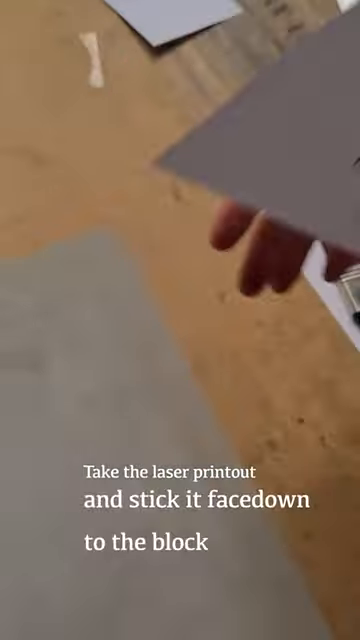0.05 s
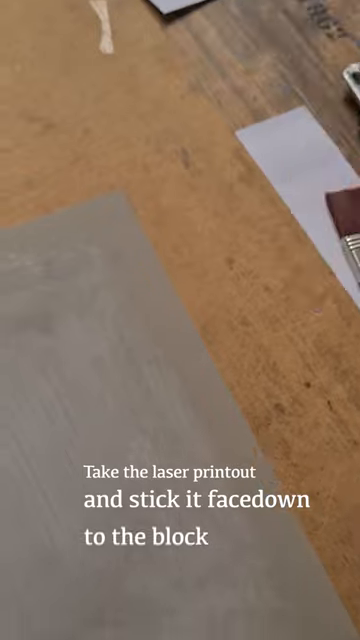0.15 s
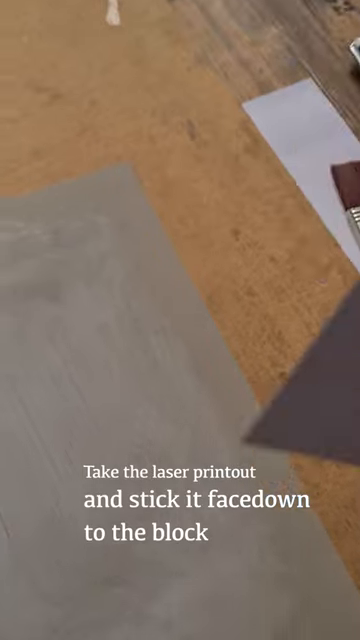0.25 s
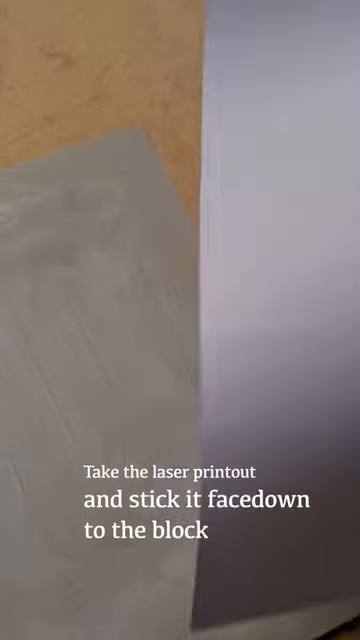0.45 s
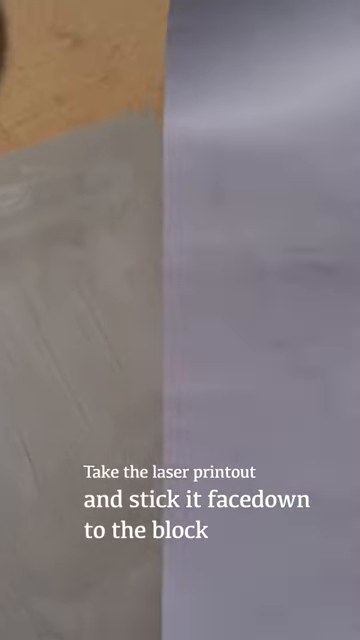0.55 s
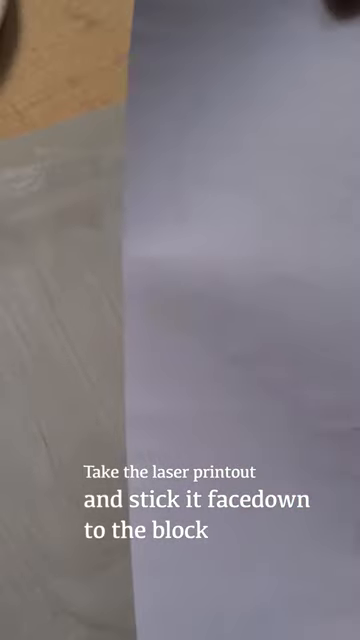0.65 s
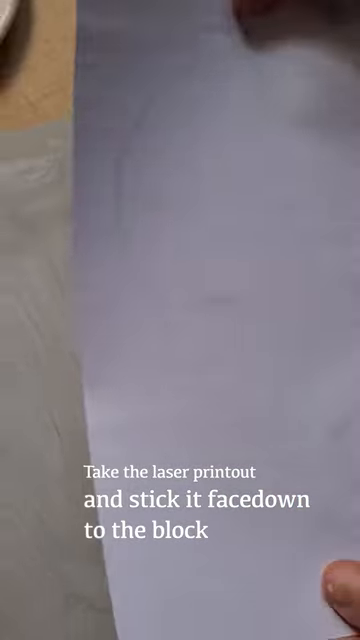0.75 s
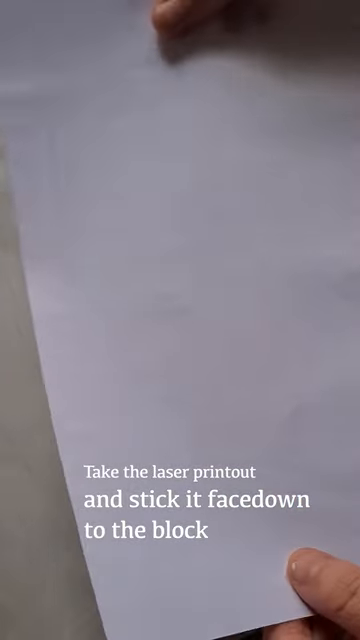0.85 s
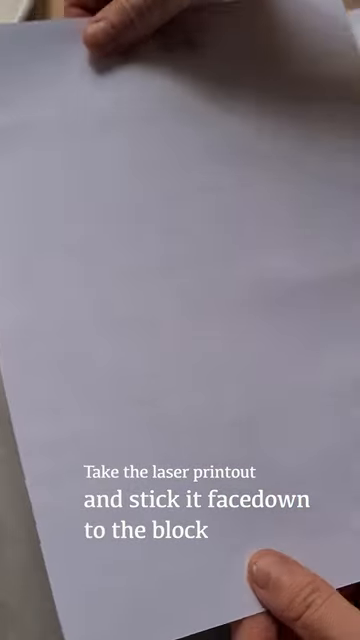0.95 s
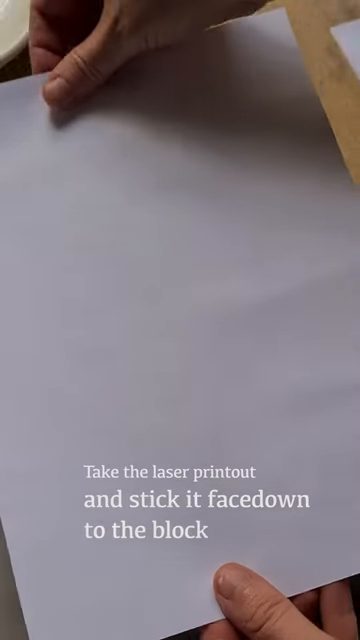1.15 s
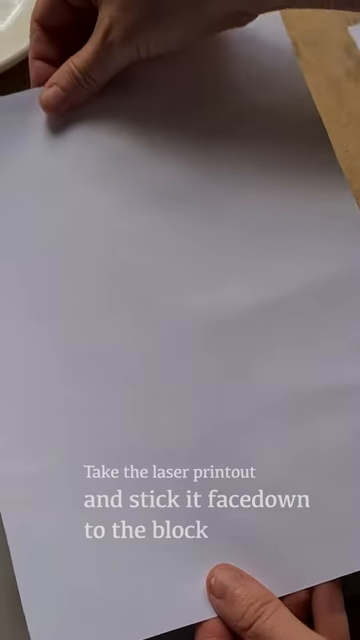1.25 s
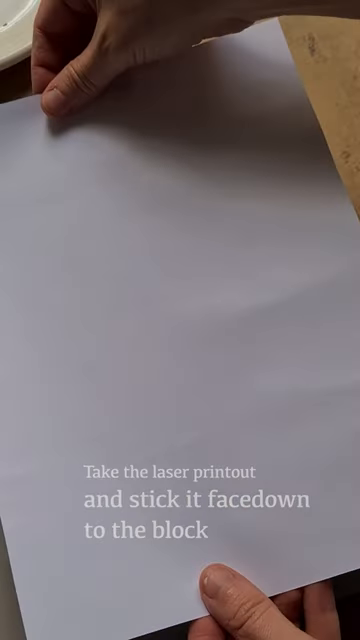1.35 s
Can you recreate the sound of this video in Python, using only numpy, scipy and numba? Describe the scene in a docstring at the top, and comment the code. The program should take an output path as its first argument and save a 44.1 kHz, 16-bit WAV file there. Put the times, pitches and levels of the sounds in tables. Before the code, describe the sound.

Paper handling up close: crisp crinkles, small pops and a soft sliding hiss in a quiet room

```python
"""Indoors, stereo: a large sheet of paper is turned over, brought near a phone and laid on a block on a table.
A quiet room of filtered noise is there from the start, with fingers and paper sliding as a fine noise hiss.
Then damped low sines puff air at the microphones, and sinking noise bands bend the sheet in short crumples.
Creases snap as clicks inside crackle; pops, knocks, pings and a faint squeak are damped sines. The sheet's
resonances colour these and the bends. All the paper has short echoes."""
import sys
import numpy as np
from scipy import signal
from scipy.fft import rfft, irfft
from scipy.io import wavfile
from scipy.ndimage import uniform_filter1d, map_coordinates
from numba import njit

SR = 44100
rng = np.random.default_rng(int(sys.argv[2]) if len(sys.argv) > 2 else 0)


def wav_record(signal):
    """Record a signal, one row per channel, as 16-bit PCM in the file named by sys.argv[1]."""
    frames = np.transpose(np.atleast_2d(signal))
    bounded = np.clip(frames, -1, 1)
    # unit amplitude maps onto the largest positive 16-bit level
    quanta = np.round(bounded * 32767).astype(np.int16)
    wavfile.write(sys.argv[1], SR, quanta)


def invert_db(x):
    """Field ratio 10**(x/20) for x, a level in decibels (scalar or array-like)."""
    u = np.asarray(x, float) / 20
    return 10 ** u


N = 61739  # samples, 1.4 s


def unit(x):
    """Scale to rms 1."""
    return x / np.sqrt(np.mean(x ** 2))


def curve(rows, column=1):
    """A table column joined by straight lines over time."""
    return np.interp(np.arange(N) / SR, [r[0] for r in rows], [r[column] for r in rows])


def decay(t, t60_s):
    """Exponential fade that falls by 60 dB in t60_s."""
    return np.exp(-np.log(1000) * t / t60_s)


def highpass(x, hz, order):
    """Butterworth filter that removes what lies below hz."""
    return signal.sosfilt(signal.butter(order, hz, "high", fs=SR, output="sos"), x)


def colour(x, rows):
    """Causal minimum-phase filter with the given (f/Hz, level/dB) shape, from the folded cepstrum."""
    hz, db = np.array(rows, float).T
    grid_hz = np.arange(4097) * SR / 8192 + 1
    log_gain = np.interp(np.log(grid_hz), np.log(hz), db) * np.log(10) / 20
    cepstrum = irfft(log_gain)
    cepstrum[1:4096] *= 2
    cepstrum[4097:] = 0
    h = irfft(np.exp(rfft(cepstrum)))
    return signal.fftconvolve(x, h / np.sqrt(np.sum(h ** 2)))[:len(x)]


@njit
def svf(x, hz, width):
    """State-variable band-pass whose centre moves; width is a share of the centre."""
    y, band, low = np.empty(len(x)), 0., 0.
    for i in range(len(x)):
        g = np.tan(np.pi * hz[i] / SR)
        v = (band + g * (x[i] - low)) / (1 + g * (g + width))
        band, low, y[i] = 2 * v - band, low + 2 * g * v, width * v
    return y


def grit(size, db):
    """Noise whose samples scatter in size, like many tiny slips."""
    scatter = np.minimum(rng.exponential(size=size), 4)
    return unit(rng.standard_normal(size) * invert_db(db * scatter))


def add(out, x, s):
    """Mix x into out from time s."""
    i = int(s * SR)
    out[..., i:i + x.shape[-1]] += x[..., :N - i]


def ring(rows):
    """Damped sines with a soft start, one a row."""
    out, t = np.zeros(N), np.arange(8000) / SR
    for s, db, hz, t60_ms in rows:
        soft_start = 1 - np.exp(-3 * min(hz, 500) * t)
        add(out, invert_db(db) * np.sin(2 * np.pi * hz * t) * soft_start * decay(t, t60_ms / 1000), s)
    return out


# tone of the quiet room at the microphones: f/Hz, level/dB per Hz (relative)
ROOM_COLOUR = [(25, -1.5), (60, -4), (110, -3), (170, -14), (250, -5.5), (330, -18), (900, -22.5),
               (2000, -20.5), (3800, -30), (8000, -42), (12500, -50), (13500, -59)]


def room():
    """Coloured noise, nearly alike left and right in the bass and less related above."""
    mid, side = (colour(rng.standard_normal(N), ROOM_COLOUR) for _ in range(2))
    side = highpass(side, 430, 1)
    return invert_db(-58.5) * unit(np.array([mid + side, mid - side]))


# loudness of the sliding paper, before left and right are mixed: t/s, level/dB
SLIDE_LEVEL = [(0, -65), (.05, -66.5), (.1, -80), (.2, -77), (.26, -63), (.31, -53), (.34, -59), (.4, -55),
               (.45, -46), (.485, -42.5), (.5, -35.5), (.53, -61), (.6, -47), (.78, -50.5), (.91, -50),
               (.95, -57), (1.04, -64.5), (1.08, -57.5), (1.112, -50), (1.118, -63.5), (1.18, -58),
               (1.22, -65.5), (1.28, -60), (1.33, -68), (1.37, -79.5)]
# drifting tone of the slide: t/s, lower band f/Hz, upper band f/Hz, treble level/dB (gain on the part above 8 kHz)
SLIDE_BANDS = [(.5, 3270, 5760, 1.5), (.7, 3320, 6060, 5.5), (.9, 4070, 6500, 10), (1.05, 3337, 5940, 12),
               (1.12, 4080, 6100, 1.5), (1.3, 4650, 6570, 12)]
# steady tone of the slide: f/Hz, level/dB per Hz (relative)
SLIDE_COLOUR = [(200, -3), (500, -1), (900, -9), (1700, -5), (3000, -1), (5000, -2), (8000, -10.5),
                (11000, -15.5), (14500, -23.5)]


def flicker():
    """Slow random wander of rms 1, from noise smoothed twice over 400 samples."""
    smooth = uniform_filter1d(rng.standard_normal(N), size=400)
    return unit(uniform_filter1d(smooth, size=400))


def slide():
    """Friction as fine gritty hiss with two drifting bands, each flickering a little."""
    slips = grit(N, 2.25)
    hiss = unit(colour(slips, SLIDE_COLOUR))
    treble = highpass(hiss, 8000, 2)
    hiss = hiss + (invert_db(curve(SLIDE_BANDS, 3)) - 1) * treble
    for column in (1, 2):
        hz = curve(SLIDE_BANDS, column)
        band = svf(svf(slips, hz, .3), hz, .4)
        hiss = hiss + invert_db(-8.5 + 2 * flicker()) * unit(band)
    return unit(hiss) * invert_db(curve(SLIDE_LEVEL) + 1.8 * flicker())


def slide_pair():
    """Hiss at left and right: one shared slide under two unrelated ones."""
    return 0.43 * slide() + 1.184 * np.array([slide(), slide()])


# air and soft thumps at the microphones, before fade and left-right balance:
# t/s, level/dB (sine peak), f/Hz, ring t60/ms
PUFFS = [(.205, -26.5, 129, 17), (.214, -49.5, 54, 210), (.285, -41, 89.5, 46), (.385, -29, 77, 54),
         (.48, -48, 61, 120), (.595, -33, 62, 78), (.63, -43, 104.3, 160), (.75, -39, 77, 117),
         (1.16, -50, 52, 130)]


def puffs():
    """The moving sheet pushes air at the microphones: low damped sines."""
    return ring(PUFFS)


# bends of the sheet, before its resonances and left-right balance:
# t/s (loudest), level/dB, f/Hz (nominal pitch at that time), rise/ms, fall/ms (to 1/e)
BENDS = [(0.209, -51, 4140, 0.9, 5.5), (0.216, -36.5, 2290, 3.6, 7.9), (0.233, -53, 1320, 7.4, 46),
         (0.347, -43.5, 1190, 1.6, 3.8), (0.3546, -39, 1710, .8, 8.6), (.376, -41.5, 1300, 4.1, 8.3),
         (.388, -43.5, 2200, 1.2, 11.3), (.5, -45, 2530, 11.6, 32), (.517, -45.5, 1170, 8.4, 11),
         (.595, -43.5, 835, 11.4, 8.8), (0.6081, -38, 1570, 1.3, 7.4), (.628, -39.5, 706, 20, 15),
         (0.64, -34.5, 2660, 5.8, 4.8), (.648, -37.5, 1420, 2.5, 16.6), (.747, -44.5, 1030, 11, 5.7),
         (.756, -38, 1940, 3.2, 17), (0.916, -43.5, 1790, 0.7, 2.6), (0.928, -54.5, 776, 2.8, 15),
         (0.982, -56.5, 1580, 5.9, 14), (0.996, -61.5, 1200, 0.93, 59)]


def bends():
    """Each bend is gritty noise in a band whose pitch holds while it swells and sags as it fades."""
    sag_oct_s, width, grit_db, skirt_db = 19, 1.26, 3, 8.5  # octaves per s, width / pitch, dB, dB
    spread = 1  # share of the upper part that differs left and right, the sheet being wide
    t = np.arange(-2500, 4000) / SR
    layers = np.zeros((3, N))  # shared, left, right
    for s, db, hz, rise_ms, fall_ms in BENDS:
        f = np.clip(hz * 2 ** (-sag_oct_s * t), hz / 2, hz * 0.94)
        shape = np.exp(np.where(t < 0, 1000 * t / rise_ms, -1000 * t / fall_ms))
        for layer in layers:
            x = svf(grit(len(t), grit_db), f / 2, 2.22)
            core = svf(svf(svf(x, f, width), f, 2 * width), f / 2, 2.0)
            skirt = svf(svf(x, f / 3, 1.57), f / 2, 17.0)  # duller part
            body = shape * (unit(core) + invert_db(skirt_db) * unit(skirt))
            add(layer, invert_db(db) * unit(body) * np.sqrt(np.mean(shape ** 2)), s + t[0])
    return layers[0] + spread * highpass(layers[1:], 700, 2)


# resonances of the sheet: f/Hz, width/Hz, level/dB (before 1 dB of gain on them all)
SHEET = [(432, 133, -2.5), (600, 15, 5.5), (1150, 400, -5), (1500, 540, -16.5), (2115, 360, 4),
         (2990, 410, 2)]


def sheet(paper):
    """The sheet rings along: parallel band-pass resonances added to the direct sound."""
    rings = np.zeros_like(paper)
    for side, x in enumerate(paper):
        for hz, width_hz, db in SHEET:
            rings[side] += invert_db(db) * svf(x, np.full(N, 1. * hz), width_hz / hz)
    return paper + invert_db(1) * rings


# creases snapping: t/s, crackle level/dB (before panning), crackle t60/ms, left minus right level/dB
SNAPS = [(0.2804, -45, 2.3, -10.5), (0.354, -42.5, 93, 1), (0.4949, -27.5, 30, 4), (0.5021, -30.5, 22, 4.5),
         (0.5077, -29.5, 40, 5.5), (0.5471, -39.5, 10, -2), (0.5537, -32, 16, 3), (.559, -38.5, 20, 5),
         (0.8099, -35.5, 8.2, 2), (0.9788, -41.5, 37, 0), (1.058, -47, 7.6, -5), (1.1145, -44.5, 6.8, -2)]
# tone of click and crackle: f/Hz, level/dB per Hz (relative)
SNAP_COLOUR = [(410, -47), (700, -4.5), (1060, -43), (1390, -2.5), (2250, -5), (3110, 7.5), (5220, -10),
               (5940, 2), (8110, -14.5), (9230, -11.5), (10200, -32), (11200, -17), (15500, -43)]


def snaps():
    """A click inside a crackle that swells fast and dies, partly different left and right."""
    rise_ms, click_db, own_share = 1, 10, 1  # swell, click peak over crackle, left-right difference
    out, t = np.zeros((2, N)), np.arange(-200, 3000) / SR
    click = colour(1. * (t == 0), SNAP_COLOUR)
    click = invert_db(click_db) * click / np.abs(click).max()
    for s, db, t60_ms, pan_db in SNAPS:
        fade = np.where(t < 0, np.exp(1000 * t / rise_ms), decay(t, t60_ms / 1000))
        tails = np.array([unit(colour(grit(len(t), 4.6) * fade, SNAP_COLOUR)) for _ in range(3)])
        crackle = unit(tails[0] + own_share * tails[1:]) * np.sqrt(np.mean(fade ** 2))
        pan = invert_db(np.array([[pan_db], [-pan_db]]) / 2)
        add(out, invert_db(db) * (click + crackle) * pan, s + t[0])
    return out


# short pops, knocks, pings and a faint squeak, before fade, sheet resonances and left-right balance:
# t/s, level/dB (sine peak), f/Hz, ring t60/ms
POPS = [(.3638, -15.5, 1306, 7.9), (.3645, -24.5, 397, 12.2), (.4965, -20.5, 1520, 10.6),
        (.5074, -15, 3700, 6.8), (.6075, -33, 620, 22), (.6375, -20, 450, 10.4), (.6378, -24.5, 1180, 11),
        (.7545, -29, 2370, 9.1), (.7565, -24, 1094, 12), (.7645, -21.5, 1110, 10.5), (.7765, -30, 1010, 12),
        (.81, -32.5, 1170, 9.3), (.9138, -31.5, 1150, 22.7), (.9775, -33, 4120, 16), (.98, -42, 1304, 29),
        (.984, -35, 2670, 8.9), (.314, -49, 2890, 60)]


def pops():
    """Short pops, knocks, pings and a faint squeak of the paper: damped sines that start downwards."""
    return -ring(POPS)


def echoes(paper):
    """Short table echoes: a decaying noise tail without bass, different left and right."""
    t = np.arange(6000) / SR
    tail = highpass(rng.standard_normal((2, len(t))), 500, 1) * decay(t, 0.092)
    tail = tail / np.sqrt(np.sum(tail ** 2) / 2)
    return invert_db(-8) * signal.fftconvolve(paper, tail, axes=1)[:, :N]


# time by which the left microphone leads the right: t/s, lead/ms
LEAD = [(0, .4), (.3, .2), (.95, .2), (1.05, -.2)]


def scene():
    """Paper a little louder at the left microphone, with echoes, air puffs and the room."""
    left_db = 2  # left over right
    balance = invert_db(np.array([[left_db], [-left_db]]) / 2)
    paper = sheet(bends() + pops()) * balance + snaps() + slide_pair() * balance
    delayed = np.arange(N) - curve(LEAD) * SR / 1000
    paper[1] = map_coordinates(paper[1], [delayed], mode="nearest")
    return paper + echoes(paper) + puffs() * balance + room()


def roll_off(x):
    """The treble ends steeply here."""
    return signal.sosfilt(signal.butter(12, 15710, fs=SR, output="sos"), x)


def record(dry):
    """The phone cuts the deepest bass, below 35 Hz."""
    mix = highpass(dry, 35, 2)
    return roll_off(mix)


dry = scene()
out = record(dry)
wav_record(out)
```